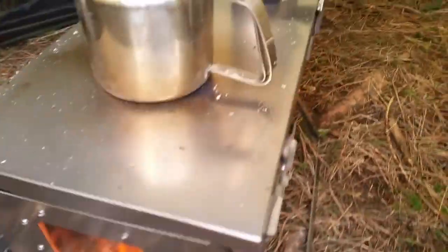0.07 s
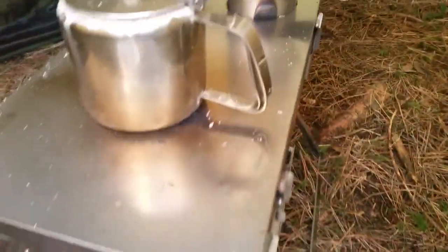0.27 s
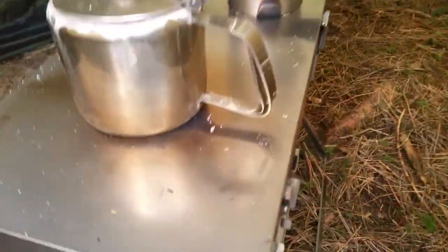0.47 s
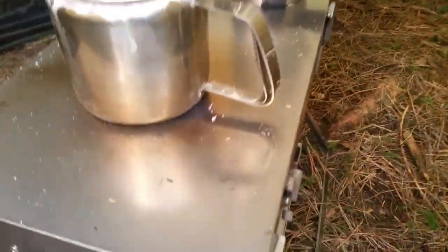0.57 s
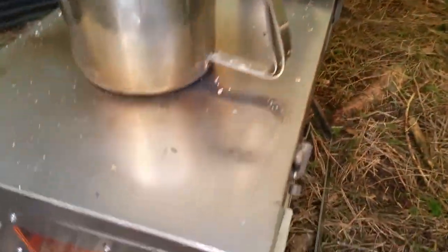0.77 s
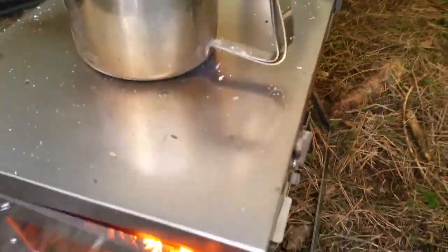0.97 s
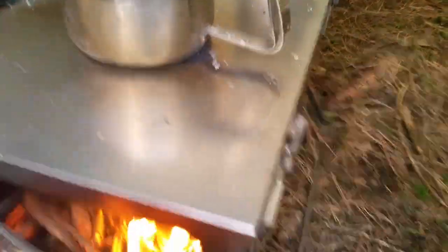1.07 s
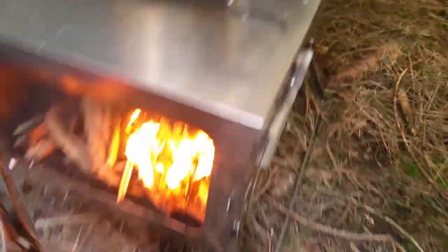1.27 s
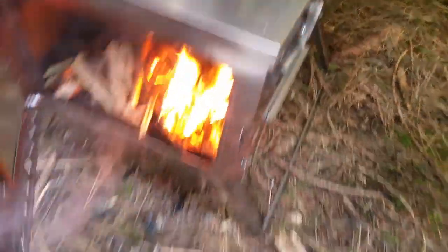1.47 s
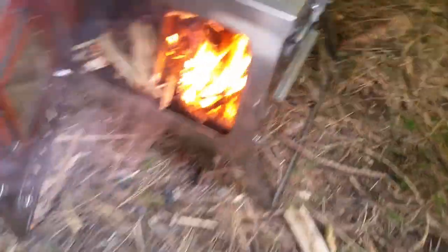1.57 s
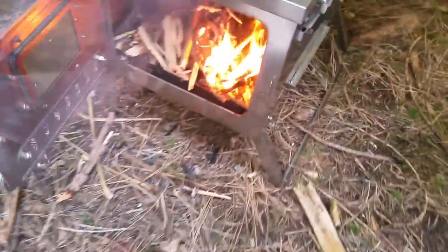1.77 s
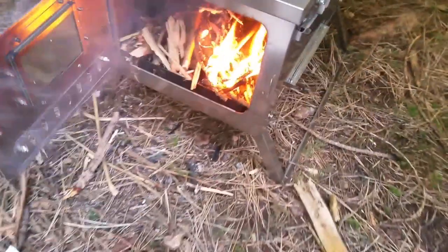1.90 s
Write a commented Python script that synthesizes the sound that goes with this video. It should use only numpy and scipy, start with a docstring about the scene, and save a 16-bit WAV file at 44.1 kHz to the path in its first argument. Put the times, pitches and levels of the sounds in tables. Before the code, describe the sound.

Small wood fire snapping and popping in a sheet-metal camp stove, with dull wood knocks

```python
"""Kindling snaps in a small sheet-metal stove: each snap is a run of tiny random fractures that swells and dies.
Fine sizzle from many random clicks lies under it, with coloured noise for the hiss, rustle, flutter and rumble.
Now and then wood knocks dully (a damped tone and a thud); the firebox hums once and a stick jets steam.
Stove walls add early echoes, and each of the two microphone ports has its own bright resonance."""
import sys
import numpy as np
from scipy import signal
from scipy.fft import rfft, irfft
from scipy.io import wavfile
from scipy.ndimage import uniform_filter1d

SR = 44100
rng = np.random.default_rng(int(sys.argv[2]) if len(sys.argv) > 2 else 0)


def output_pcm(signal):
    """Save a mono or channel-first signal as 16-bit PCM at the path in sys.argv[1].

    Samples are clipped to [-1, 1] before scaling.
    """
    pcm = np.clip(np.atleast_2d(signal).T, -1, 1) * 32767
    wavfile.write(sys.argv[1], SR, np.round(pcm).astype(np.int16))


N = 88288
TIME = np.arange(N) / SR

# how strongly the flames move the air: t/s, low flutter relative level/dB, midrange rustle relative level/dB
FLAME_LEVELS = [(0, -61, -57.5), (.27, -62.5, -56.5), (.39, -65, -63.5), (.56, -65, -64.5), (.63, -54, -85),
                (.8, -55.5, -52.5), (.92, -57, -61), (.98, -48, -48), (1.08, -49.5, -56),
                (1.27, -56.5, -56), (1.35, -56.5, -56.5), (1.385, -50.5, -46.5), (1.45, -56.5, -57.5),
                (1.55, -52.5, -49.5), (1.68, -58, -59.5), (1.9, -68.5, -58.5), (1.98, -51.5, -47.5)]

# how alike the two ports hear a sound (0 = unrelated, 1 = identical)
BRIGHT_LIKENESS, LOW_LIKENESS, RUSTLE_LIKENESS, RUMBLE_LIKENESS = 0.18, 0.9, 0.48, 0.9
GRAIN_S = 0.001  # decay time of the ring after one tiny crack
UNEVEN_DB = 1.24  # depth of random unevenness in time and frequency


def amp(db):
    """Turns decibels into a gain."""
    return 10 ** (np.asarray(db) / 20)


def unit(x):
    """Scales a sound to an average strength (rms) of 1."""
    return x / np.sqrt(np.mean(x ** 2) + 1e-20)


def level(rows, axis=1):
    """Draws a gain over time through the points of one dB column."""
    rows = np.array(rows)
    return amp(np.interp(TIME, rows[:, 0], rows[:, axis]))


def add(mix, s, sound):
    """Mixes a stereo sound in at time s, cut off at the end of the mix."""
    part = mix[:, max(round(s * SR), 0):][:, :sound.shape[1]]
    part += sound[:, :part.shape[1]]


def panned(x, pan_db):
    """Makes the left port louder than the right by pan_db."""
    return x * amp(np.vstack([pan_db, -pan_db]) / 2)


def colour(x, points, size=8192):
    """Filters a sound to follow a spectrum, without any sound ahead of its cause."""
    hz, db = np.transpose(points)
    f = abs(np.fft.fftfreq(size, 1 / SR))
    gain_db = np.interp(np.log(f + 1), np.log(hz + 1), db)
    log_gain = np.log(amp(gain_db))
    # the Hilbert transform supplies the phase that puts the energy as early as possible
    response = np.exp(np.conj(signal.hilbert(log_gain)))
    taps = np.fft.ifft(response).real[:size // 2]
    return signal.fftconvolve(x, taps[None])[:, :x.shape[1]]


def pair(likeness, size=N):
    """Makes two partly alike channels of white noise."""
    a, b = rng.standard_normal((2, size))
    c = np.clip(likeness, -1, 1)
    return np.array([a, c * a + np.sqrt(1 - c * c) * b])


def flicker(depth_db, rate_hz):
    """Makes a randomly wavering gain from noise slowed down above rate_hz."""
    spectrum = rfft(rng.standard_normal(N))
    f = np.fft.rfftfreq(N, 1 / SR)
    slow = irfft(spectrum / (1 + (f / rate_hz) ** 4), N)
    return amp(depth_db * unit(slow))


def clicks(per_s, spread_db, size=N):
    """Scatters clicks of random sign in time, mostly small and a few larger."""
    sizes = amp(spread_db * np.minimum(rng.exponential(1, size), 4))
    signs = rng.choice([-1, 1], size)
    happens = rng.random(size) < per_s / SR
    return sizes * signs * happens


def burst(decay_s, size):
    """Makes a dying scatter of reflections, with energy 1 at each port."""
    x = pair(BRIGHT_LIKENESS, size) * np.exp(-np.arange(size) / SR / decay_s)
    return x / np.linalg.norm(x, axis=1, keepdims=True)


def uneven(x, depth_db, size=256, frame_count=9, bin_count=4):
    """Makes a noisy sound randomly uneven in time and frequency."""
    z = signal.stft(x, nperseg=size)[-1]
    field = rng.standard_normal(z[0].shape)
    field = uniform_filter1d(field, frame_count)  # smooth over time
    field = uniform_filter1d(field, bin_count, axis=0)  # smooth over frequency
    return signal.istft(z * amp(depth_db * unit(field)), nperseg=size)[-1][:, :N]


def walls(x, count=6, longest_s=0.005, echo_db=-6):
    """Early echoes off the stove's walls give the sound a boxy colour."""
    taps = np.zeros((2, 1024))
    for row in taps:
        delays = (np.arange(count) + 1 + rng.random(count)) / (count + 1) * longest_s
        places = np.clip(delays * SR, 1, len(row) - 1).astype(int)
        row[places] = rng.choice([-1, 1], count) * amp(echo_db) / np.sqrt(count)
    taps[:, 0] = 1  # the direct sound
    return signal.oaconvolve(x, taps / np.linalg.norm(taps[0]), axes=1)[:, :N]


def rumble():
    """A steady, very low noise, nearly the same at both ports."""
    # spectrum of the rumble: f/Hz, level per Hz/dB
    rumble_colour = [(10, -1), (25, 4), (75, -4), (108, 2), (165, -8), (220, -20.5), (4000, -66)]
    return amp(-54.5) * unit(colour(pair(RUMBLE_LIKENESS), rumble_colour))


def hiss():
    """Soft hiss: bright noise, made slightly uneven at random."""
    # slow course of the hiss: t/s, relative level/dB
    hiss_levels = [(0, -48.5), (.25, -49.5), (.37, -58), (.6, -56.5), (1.0, -49.5), (1.27, -61),
                   (1.42, -50.5), (2.0, -62.5)]
    # spectrum of the hiss: f/Hz, level per Hz/dB
    hiss_colour = [(200, -26), (1000, -2.5), (2500, 1), (7000, 0), (15000, -5.5)]
    noise = colour(pair(BRIGHT_LIKENESS), hiss_colour)
    return amp(-1.5) * level(hiss_levels) * unit(uneven(noise, UNEVEN_DB))


def rustle():
    """The midrange rustle of the flames: flickering noise with echoes off the walls."""
    # spectrum of the rustle: f/Hz, level per Hz/dB
    rustle_colour = [(200, 4), (600, -8), (1200, -1), (2200, 4.5), (4000, -6), (12000, -23.5)]
    noise = colour(walls(pair(RUSTLE_LIKENESS)), rustle_colour)
    noise = noise * flicker(depth_db=2.5, rate_hz=30)
    return amp(-2) * level(FLAME_LEVELS, axis=2) * unit(noise)


def flutter():
    """The low flutter of the flames: deep noise that swells and sinks."""
    # spectrum of the flutter: f/Hz, level per Hz/dB
    flutter_colour = [(50, -27), (120, -3), (180, 2.5), (300, -8), (650, -8), (1200, -22.5), (5000, -28.5)]
    noise = colour(pair(LOW_LIKENESS), flutter_colour)
    return amp(-2.5) * level(FLAME_LEVELS) * unit(noise)


def draught():
    """A surge of flame makes the firebox hum briefly; the pitch dips, then rises."""
    # hum in the firebox: t/s, peak level/dB, pitch before slight wavering f/Hz
    hum_points = [(1.03, -82.5, 185), (1.08, -50.5, 164.3), (1.139, -48.5, 155.5), (1.183, -47, 215),
                  (1.25, -53, 245.2), (1.32, -68, 245.3)]
    s, _, hz = np.transpose(hum_points)
    pitch = np.interp(TIME, s, hz) * flicker(depth_db=0.5, rate_hz=124)
    turns = np.cumsum(pitch) / SR
    return level(hum_points) * np.sin(2 * np.pi * turns)


def steam():
    """A jet of steam sputters from a stick: flickering noise through two narrow resonances."""
    # course of the jet: t/s, relative level/dB
    jet_levels = [(1.924, -100), (1.928, -44.5), (1.975, -48), (2.0, -58)]
    x = pair(BRIGHT_LIKENESS) * flicker(depth_db=5.0, rate_hz=160)
    jet = 0
    for hz in (6300, 8630):
        peak = signal.iirpeak(hz, 7, fs=SR)
        jet = jet + signal.lfilter(*peak, signal.lfilter(*peak, x))  # twice, for a narrower peak
    return level(jet_levels) * panned(unit(jet), -6)


def knocks():
    """Bumps of shifting wood: one damped tone with a noisy thud, weaker for small, high-pitched sticks."""
    # one knock a row: t/s, relative level/dB, rise/s, decay/s, pitch f/Hz
    knock_list = [(0.577, -45.5, 0.0042, 0.024, 279), (.761, -37, .002, 0.0094, 3484),
                  (.765, -47, 0.0024, 0.03, 179.3), (.972, -42.5, 0.0034, 0.022, 188.6),
                  (1.488, -42.5, 0.00075, 0.0081, 1154), (1.492, -46, 0.0024, 0.012, 542.6),
                  (1.495, -49, 0.0045, 0.038, 161), (1.942, -31.5, 0.021, 0.014, 267.5),
                  (1.981, -41, 0.0019, 0.0064, 780)]
    # spectrum of the thud: multiple of the pitch, level per Hz/dB
    knock_colour = [(.3, -20), (1, 3), (1.7, -1.5), (3.5, -9), (12, -32), (40, -37)]
    thud_db, ring_db = -2, 1
    thud_hz = 453  # above this pitch the thud weakens
    out = np.zeros((2, N))
    t = TIME[:SR // 3]
    for s, db, rise_s, decay_s, hz in knock_list:
        body = [(hz * multiple, gain_db) for multiple, gain_db in knock_colour]
        thud = unit(colour(pair(LOW_LIKENESS, len(t)), body))
        thud = amp(thud_db) * min(1, thud_hz / hz) * thud
        tone = amp(ring_db) * np.sin(2 * np.pi * hz * t)
        envelope = np.minimum(t / rise_s, 1) * np.exp(-t / decay_s)
        add(out, s, amp(db) * (thud + tone) * envelope)
    return out


def sizzle(count=10):
    """Tiny cracks from many spots, each spot with its own short ring."""
    # course of the fine crackle: t/s, relative level/dB, left over right/dB
    sizzle_points = [(0, -59, -5), (.55, -57.5, -1), (.65, -52, 2.5), (.69, -41, -5), (.80, -40, -1),
                     (.90, -46.5, -2), (.95, -42, 3), (1.11, -50, 0), (1.20, -48, 15), (1.26, -60, -2),
                     (1.42, -52, -7), (1.48, -32, -5), (1.53, -37.5, 3), (1.656, -53.5, -5),
                     (1.69, -42, -1), (1.773, -42.5, -7), (1.82, -50.5, -8), (1.91, -56.5, -1)]
    # spectrum of the sizzle: f/Hz, level per Hz/dB
    sizzle_colour = [(200, -21.5), (1000, -10.5), (4500, 0), (7000, 2), (15000, -7.5)]
    cracks_per_s = 2200  # all spots together
    out = np.zeros((2, N))
    for _ in range(count):
        cracks = clicks(cracks_per_s / count, spread_db=1)
        ring = burst(GRAIN_S, size=600)
        out += signal.oaconvolve(cracks[None], ring)[:, :N]
    out = uneven(colour(out, sizzle_colour), UNEVEN_DB)
    out = out * flicker(depth_db=2.5, rate_hz=62)
    s, _, pan_db = np.transpose(sizzle_points)
    return amp(-5) * level(sizzle_points) * panned(unit(out), np.interp(TIME, s, pan_db))


def snap(db, pan_db, swell_s, middle_db, top_db, size=6000):
    """A run of fractures that swells and dies, scattered by the firebox."""
    tail_s, tail_db = 0.011, -3  # scattering in the firebox
    t = TIME[:size]
    fractures = clicks(per_s=6000, spread_db=2, size=size)
    run = fractures * t * np.exp(-t / swell_s)  # highest at swell_s
    run = signal.fftconvolve(run[None], burst(GRAIN_S, size))[:, :size]
    run /= np.linalg.norm(run, axis=1, keepdims=True) + 1e-15
    tail = amp(tail_db) * burst(tail_s, size) * (1 - np.exp(-t / swell_s))
    tone_balance = [(3000, middle_db), (5500, 0), (8000, 0), (12000, top_db)]
    x = colour(run + tail, tone_balance, size=512)
    return amp(db) * panned(x, pan_db)


def snaps():
    """The sticks that break in the heat, one snap after another."""
    # one snap a row: t/s, relative level/dB, left over right/dB, time to the height of the fracture/s,
    # woody middle/dB, top treble/dB
    snap_list = [(0.4394,-40.5,6,0.0017,-6,-10), (0.469,-39,-14,0.0016,-6.5,-3),
                 (0.5788,-28.5,-0.5,0.00078,1,-10.5), (.672,-23.5,-6,0.0028,-9,-6),
                 (0.683,-22,-5,0.0008,-2,7), (0.6976,-26.5,8,0.00098,-11,-6),
                 (0.7044,-17.5,0.5,0.00074,-7.5,5), (.711,-21,-7.5,0.0023,2,-3),
                 (0.7601,-21,2,0.0013,5.5,-3), (0.7697,-18.5,-4,0.00083,2.5,-2.5),
                 (0.815,-29,3,0.00064,-9,-2), (.865,-30,1,0.0027,-4.5,2), (0.9136,-23,1,0.0018,-4,-11),
                 (0.921,-22.5,4,0.0015,-9,-3), (.928,-19,-2,0.0013,4.5,-38),
                 (1.0032,-26.5,-4.5,0.0004,-3,-1.5), (1.059,-32.5,-2.5,0.00085,13.5,3),
                 (1.077,-30,3.5,0.002,9,3.5), (1.1604,-16.5,4,0.0013,-10,-5.5), (1.177,-21,-3,0.0057,4.5,0),
                 (1.193,-10.5,3.5,0.0001,-6,4), (1.1952,-18.5,4,0.002,3.5,-1), (1.348,-40,-4,0.00057,-15,7),
                 (1.4517,-26.5,2.5,0.00071,-4,9), (1.4887,-13,-7,0.00061,-7.5,3),
                 (1.4911,-13,-2,0.0016,1.5,7), (1.504,-21,-10,0.0041,7.5,8), (1.5216,-17.5,-3,0.00095,1,11),
                 (1.561,-23.5,-2.5,0.00086,-1,5), (1.5908,-25,-1.5,0.00065,-2.5,8),
                 (1.6714,-23,-3.5,0.0022,-5.5,-1.5), (1.952,-29.5,-3,0.00078,-8,4),
                 (1.9799,-17.5,-1.5,0.0027,7.5,-9), (1.989,-24.5,-7,0.0007,0,-4)]
    # spectrum shared by all snaps: f/Hz, level per Hz/dB
    snap_colour = [(100, -14.5), (1200, -12.5), (2500, -5), (4500, -5), (7000, -2.5), (11000, -7.5),
                   (15000, -10)]
    out = np.zeros((2, N))
    for s, *row in snap_list:
        add(out, s, snap(*row))
    return amp(17) * colour(out, snap_colour)


def scene():
    """The whole fire as it reaches the two microphone ports."""
    flames = rumble() + flutter() + rustle() + hiss()
    crackle = walls(snaps() + sizzle())
    return crackle + knocks() + flames + draught() + steam()


def record(dry):
    """Each port adds its resonances, then the highest treble is cut off."""
    # response of the left microphone port: f/Hz, gain/dB
    left_port = [(800, 0.5), (1500, -5.5), (2600, -5), (4200, 1), (5500, 10), (5900, 9.5), (6500, 1.5),
                 (9100, -6), (10400, -5.5), (13000, -6), (15000, -5.5), (16000, -30)]
    # response of the right microphone port: f/Hz, gain/dB
    right_port = [(20, -1.5), (1500, 0.5), (2800, -11.5), (3800, -0.5), (5000, -4), (6100, 1), (7300, 9),
                  (8500, 4), (10400, -5), (13000, -3), (15000, -5.5), (16000, -27)]
    edge_hz = 16400
    x = np.vstack([colour(dry[:1], left_port), colour(dry[1:], right_port)])
    low_pass = signal.firwin(511, edge_hz, window=("kaiser", 9), fs=SR)
    return signal.oaconvolve(x, low_pass[None], "same")


dry = scene()
out = record(dry)
output_pcm(out)
```